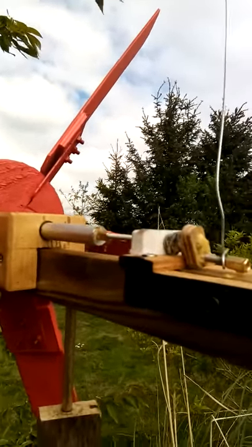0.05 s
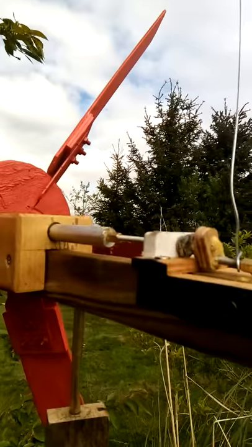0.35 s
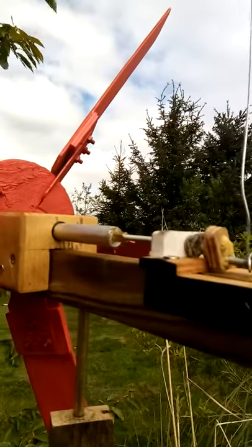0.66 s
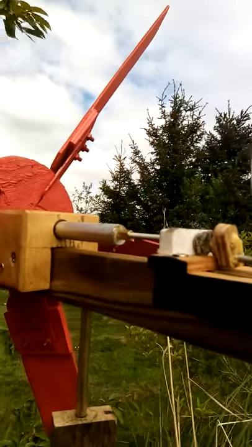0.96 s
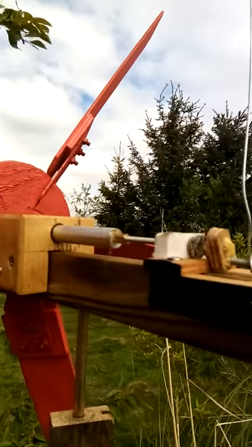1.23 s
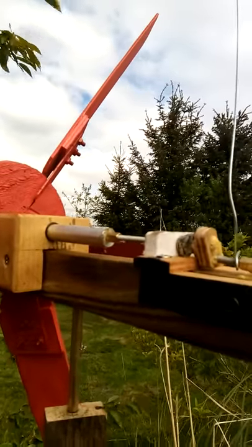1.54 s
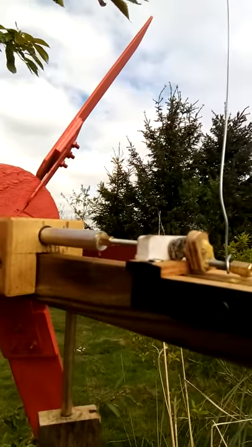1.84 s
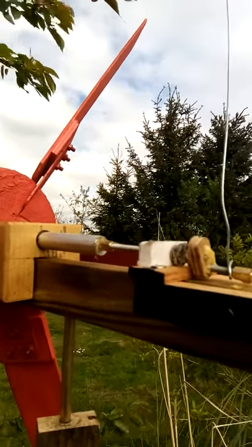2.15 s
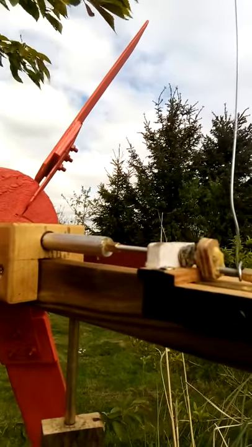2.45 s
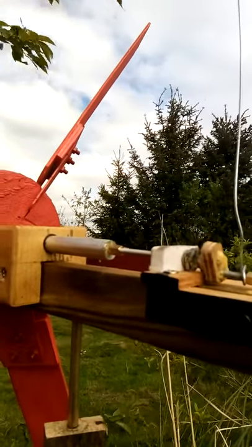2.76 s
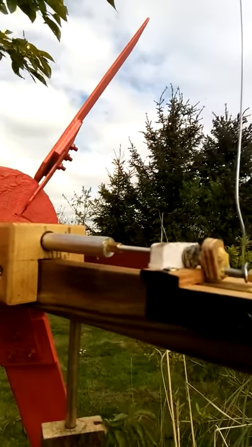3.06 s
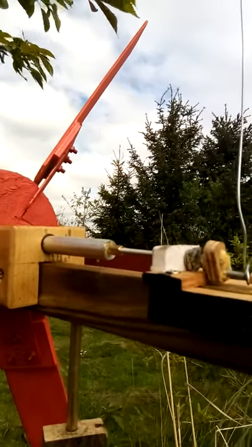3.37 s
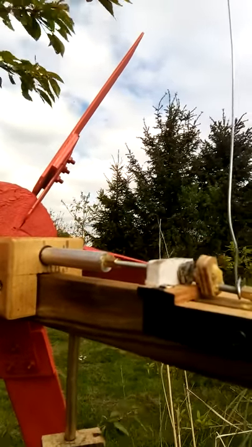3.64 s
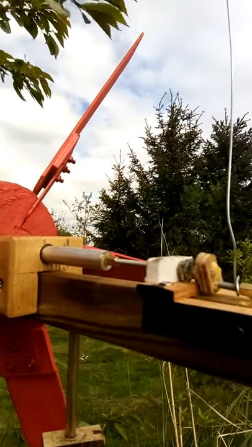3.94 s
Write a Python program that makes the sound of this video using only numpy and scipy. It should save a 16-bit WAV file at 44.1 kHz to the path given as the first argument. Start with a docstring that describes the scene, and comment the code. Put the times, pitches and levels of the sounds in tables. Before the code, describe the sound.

A wooden whirligig clacks with a short metallic ring from about 0.4 seconds, roughly four times a second, with faint rubbing and ticks between. The clacks are strongest from 0.7 to 1.7 seconds, then slow and soften. Wind rumbles and thumps unevenly on the microphone throughout. A small bird gives a faint falling chirp at 0.5 seconds and a high buzz from 3.3 seconds to the end.

```python
"""A ringing clack, again and again and ever slower, comes through rumbling wind: a wooden whirligig turns
in a garden. Once a turn its steel shaft drops in its metal sleeve and sets it ringing; in between it rubs
lightly. Gusts rumble and thump on each of the two microphone openings (ports) separately, over a faint
hiss. A small bird gives a falling chirp and later a long buzz."""
import sys
import numpy as np
from scipy import signal
from scipy.fft import rfft, irfft
from scipy.io import wavfile
from scipy.ndimage import uniform_filter1d

SR = 44100
rng = np.random.default_rng(int(sys.argv[2]) if len(sys.argv) > 2 else 0)


def wav_out(sig):
    """Save sig, one row per channel (or a flat mono array), as 16-bit PCM at SR to the path in sys.argv[1]."""
    wavfile.write(sys.argv[1], SR, np.round(np.clip(np.atleast_2d(sig).T, -1, 1) * 32767).astype(np.int16))


N = 176400
T = np.arange(N) / SR

# the shaft drops once a turn: (time [s], relative level [dB], fade time of the rattle [s])
SHAFT_DROPS = [(.437, -31.5, 0.017), (0.7335, -22.5, 0.031), (0.9664, -23.5, 0.025), (1.199, -20, 0.032),
               (1.4349, -20, 0.033), (1.689, -20.5, 0.032), (1.9791, -24.5, 0.044), (2.2793, -24, 0.017),
               (2.5945, -27, 0.03), (2.905, -27, 0.026), (3.2187, -29.5, 0.026), (3.875, -34, 0.041)]
# tone colour of scrapes and ticks: (frequency [Hz], relative level [dB])
SCRAPE_COLOUR = [(2500, -5), (4500, -1.5), (6000, 4), (7500, -1.5), (9000, -10.5), (11500, -25),
                 (15000, -27)]


def from_db(db):
    """Turn decibels into a factor to multiply by."""
    return 10 ** (np.asarray(db) / 20)


def rms_one(x):
    """Scale a signal so that its average level (rms) is 1."""
    return x / np.sqrt(np.mean(x ** 2) + 1e-20)


def curve(rows):
    """A volume curve through (time [s], level [dB]) points."""
    return from_db(np.interp(T, *np.transpose(rows)))


def colour(x, points):
    """Filter through (frequency [Hz], level [dB]) points; white noise keeps its power."""
    size = 2 * N
    hz, db = np.transpose(points)
    log_hz = np.log(np.fft.rfftfreq(size, 1 / SR) + 1)
    gain = rms_one(from_db(np.interp(log_hz, np.log(hz), db)))
    # minimum phase: the filter never sounds ahead of its input
    cepstrum = irfft(np.log(gain))
    cepstrum[1:N] *= 2
    cepstrum[N + 1:] = 0
    return irfft(rfft(x, size) * np.exp(rfft(cepstrum)))[..., :N]


def drift(rate_hz):
    """A random wander of typical size 1, mostly slower than rate_hz."""
    hz = np.fft.rfftfreq(N, 1 / SR)
    return rms_one(irfft(rfft(rng.standard_normal(N)) / (1 + (hz / rate_hz) ** 2), N))


def flicker(rate_hz, depth_db):
    """A volume that wavers at random, by twice depth_db at most."""
    return from_db(depth_db * np.clip(drift(rate_hz), -2, 2))


def even(x, samples):
    """Hold the short-term level of a noise at 1."""
    power = uniform_filter1d(uniform_filter1d(x ** 2, samples), samples)
    return x / np.sqrt(power + 1e-12)


def decay(start, fade_s):
    """A sudden start that dies away."""
    return (T >= start) * np.exp(-np.maximum(T - start, 0) / fade_s)


def swell(centre, width_s):
    """A smooth rise and fall."""
    return np.exp(-((T - centre) / width_s) ** 2)


def stereo_noise(alike):
    """White noise for left and right; alike (0 to 1) is the share they have in common."""
    common = np.sqrt(alike) * rng.standard_normal(N)
    return common + np.sqrt(1 - alike) * rng.standard_normal((2, N))


def ring(x, hz, ring_s):
    """One ringing tone, set off by x, that fades by 60 dB in ring_s."""
    damping, angle = from_db(-60 / (ring_s * SR)), 2 * np.pi * hz / SR
    return signal.lfilter([0, np.sin(angle)], [1, -2 * damping * np.cos(angle), damping ** 2], x + 1e-18)


def air():
    """The breeze in the trees and the microphone's own hiss make a faint, steady noise."""
    # tone colour of the hiss: (frequency [Hz], relative level [dB])
    hiss_colour = [(500, 0.5), (1000, 1), (2000, -17.5), (4000, -22), (8000, -17), (11000, -26.5),
                   (13500, -39.5), (15000, -21.5)]
    return from_db(-55.5) * colour(stereo_noise(alike=0.12), hiss_colour)


def bird_buzz(pulse_hz=160.7):
    """A bird buzzes in rapid, nearly regular pulses, blurred by distance."""
    # loudness of the buzz: (time [s], level [dB])
    buzz_levels = [(3.24, -85), (3.31, -55), (3.45, -52), (3.56, -46), (3.61, -53.5), (3.68, -47.5),
                   (3.76, -46.5), (3.86, -52), (3.93, -52.5), (3.98, -68)]
    # its tone colour: (frequency [Hz], relative level [dB])
    buzz_colour = [(1500, -55), (3050, -32), (3650, -6), (4050, -3), (4450, 0), (4850, -1), (5350, -5),
                   (6200, -24), (9000, -55)]
    cycles = np.cumsum(pulse_hz * (1 + 0.004 * drift(10))) / SR
    pulses = rms_one(np.diff(np.floor(cycles), prepend=0))
    blur = stereo_noise(alike=0) * rms_one(1 + np.cos(2 * np.pi * cycles) / 2)
    arrivals = np.array([np.roll(pulses, 20), pulses])   # reaches the right port first
    return curve(buzz_levels) * colour(rms_one(arrivals + 1.6 * blur), buzz_colour)


def bird_chirp(blur_hz=170):
    """The bird gives a thin falling whistle, blurred by distance."""
    # the call: (time [s], length [s], start pitch [Hz], end pitch [Hz], relative level [dB])
    chirps = [(0.518, 0.048, 5270, 4460, -51.5)]
    out = np.zeros(N)
    for start, length, start_hz, end_hz, db in chirps:
        glide = np.sqrt(np.clip((T - start) / length, 0, 1))
        phase = 2 * np.pi * np.cumsum(start_hz + (end_hz - start_hz) * glide) / SR
        whistle = (1 + drift(blur_hz)) * np.sin(phase) + drift(blur_hz) * np.cos(phase)
        out += from_db(db) * np.sin(np.pi * glide) * whistle
    return out * from_db([[3.3], [-3.3]])   # louder on the left


def buffets(eddies, spikes_per_s=550, low_cut_hz=223, size=4096):
    """Each eddy (swirl of air) thumps a port with one sharp pressure spike amid a few random ones."""
    out = np.zeros(N + 2 * size)
    hz = np.fft.rfftfreq(size, 1 / SR)
    t = (np.arange(size) - size // 2) / SR
    high_pass = signal.butter(2, low_cut_hz, "high", fs=SR, output="sos")
    low_cut = signal.sosfreqz(high_pass, hz, fs=SR)[1]
    for time, db, fall_hz, length in eddies:
        spikes = 0.66 * (rng.random(size) < spikes_per_s / SR) * rng.uniform(-1.575, 1.87, size)
        spikes += 0.018 * rng.standard_normal(size)
        spikes *= np.exp(-2 * (t / length) ** 2)
        spikes[size // 2] = rng.choice([-1, 1])   # the main spike pushes or pulls
        treble_cut = np.exp(-hz / fall_hz) / (1 + (hz / 2600) ** 4)
        thump = rms_one(irfft(rfft(spikes) * low_cut * treble_cut))
        start = int(time * SR) + size // 2
        out[start:start + size] += from_db(db + 4) * thump * np.sqrt(length * SR / size)
    return out[size:size + N]


def gusts(strength):
    """Wind on one port makes a lumpy rumble; fine swirls add a flutter on top."""
    # tone colours of the rumble and the flutter: (frequency [Hz], relative level [dB])
    rumble_colour = [(20, -34), (35, -16.5), (60, -7), (95, 1), (140, -2.5), (200, -8.5), (300, -17.5),
                     (450, -37.5), (800, -75.5), (2000, -83.5)]
    flutter_colour = [(100, -16.5), (250, 5), (450, -2), (700, -12), (1100, -20), (1800, -38.5),
                      (4000, -80)]
    lumps = rms_one(flicker(rate_hz=35, depth_db=2.5))
    rumble = even(colour(rng.standard_normal(N), rumble_colour), samples=1000)
    flutter = rms_one(colour(rng.standard_normal(N), flutter_colour) * flicker(rate_hz=59, depth_db=5))
    return curve(strength) * lumps * (from_db(4.5) * rumble + from_db(-11.5) * flutter)


def wind():
    """Each port is hit by its own gusts and eddies."""
    # strength of the wind: (time [s], relative level [dB])
    strength_left = [(0.0, -18), (0.1, -38.5), (0.36, -24.5), (0.42, -56), (0.5, -28.5), (0.76, -24.5),
                     (0.86, -28), (0.92, -22), (1.16, -35), (1.26, -17.5), (1.4, -26.5), (1.44, -36.5),
                     (1.5, -21.5), (1.96, -24.5), (2.1, -32.5), (2.14, -23.5), (2.29, -29.5), (2.33, -36),
                     (2.39, -27.5), (2.54, -41.5), (2.61, -25.5), (2.69, -42.5), (2.79, -24.5),
                     (2.89, -28.5), (2.95, -20), (2.97, -36), (3.01, -23), (3.11, -25.5), (3.37, -19.5),
                     (3.45, -29), (3.47, -21.5), (3.57, -20), (3.69, -26.5), (3.73, -37), (3.85, -19),
                     (3.99, -28.5)]
    strength_right = [(0.0, -33), (0.12, -18), (0.32, -36), (0.36, -20), (0.46, -22), (0.52, -53),
                      (0.64, -31), (0.83, -26), (0.88, -45), (0.96, -19), (1.0, -30), (1.12, -22.5),
                      (1.38, -33.5), (1.52, -22.5), (1.62, -41), (1.66, -39), (1.7, -33.5), (1.8, -21.5),
                      (1.92, -40), (2.08, -21.5), (2.2, -50), (2.31, -26), (2.43, -39.5), (2.49, -27.5),
                      (2.59, -22), (2.65, -39), (2.71, -21.5), (2.87, -41), (2.91, -23), (3.21, -37.5),
                      (3.33, -21.5), (3.37, -35), (3.41, -34), (3.49, -52), (3.59, -18), (3.63, -43),
                      (3.67, -26), (3.75, -43), (3.99, -26.5)]
    # eddies that hit: (time [s], relative level [dB], treble fall-off [Hz], length [s])
    eddies_left = [(0.032, -13, 167, 0.0035), (0.569, -21.5, 208, 0.005), (0.652, -18.5, 327, 0.008),
                   (0.687, -16.5, 387, 0.0079), (0.723, -22, 313, 0.0056), (0.806, -25, 245, 0.01),
                   (0.894, -10, 306, 0.0047), (0.931, -15, 200, 0.0031), (1.026, -13.5, 437, 0.0099),
                   (1.059, -24.5, 440, 0.023), (1.281, -15.5, 480, 0.022), (1.37, -18, 218, 0.0082),
                   (1.539, -15.5, 231, 0.0093), (1.614, -15.5, 318, 0.0026), (1.634, -21.5, 212, 0.007),
                   (1.712, -25.5, 197, 0.025), (1.798, -19.5, 507, 0.0035), (1.874, -22, 221, 0.006),
                   (1.929, -23, 228, 0.015), (1.961, -16, 257, 0.011), (2.142, -20, 520, 0.0062),
                   (2.193, -20.5, 294, 0.0053), (2.748, -17.5, 214, 0.0045), (2.795, -13, 387, 0.0097),
                   (2.813, -19, 474, 0.013), (2.844, -20.5, 320, 0.013), (3.011, -25, 243, 0.017),
                   (3.06, -21, 260, 0.0062), (3.078, -19, 232, 0.0085), (3.14, -19, 283, 0.0085),
                   (3.222, -19, 304, 0.012), (3.487, -14.5, 426, 0.0031), (3.602, -15.5, 1450, 0.0086),
                   (3.811, -18.5, 356, 0.0052), (3.846, -20.5, 230, 0.0043), (3.868, -19, 308, 0.01),
                   (3.9, -24, 383, 0.0081), (3.955, -15.5, 223, 0.009)]
    eddies_right = [(0.038,-27,194,0.0088), (0.104,-22,233,0.016), (0.173,-16.5,364,0.0072),
                    (0.208,-19,185,0.0047), (0.225,-18,173,0.0091), (0.363,-20.5,210,0.014),
                    (0.383,-17,258,0.0047), (0.4,-17,218,0.022), (0.425,-27,376,0.019),
                    (0.448,-17.5,240,0.0058), (1.065,-18,290,0.013), (1.109,-20.5,317,0.005),
                    (1.124,-12.5,346,0.0061), (1.239,-18,163,0.013), (1.662,-14.5,144,0.0089),
                    (1.278,-33,220,0.006), (1.791,-21,189,0.0051), (1.86,-17.5,236,0.013),
                    (2.064,-20.5,224,0.011), (2.079,-20.5,263,0.0066), (2.225,-26,230,0.019),
                    (2.306,-16.5,173,0.01), (2.321,-12.5,206,0.0063), (2.503,-19.5,224,0.0077),
                    (2.55,-23.5,438,0.0045), (2.923,-22.5,203,0.018), (2.951,-22.5,181,0.0083),
                    (3.262,-21.5,248,0.015), (3.331,-23.5,219,0.006), (3.577,-24.5,240,0.0038),
                    (3.671,-23,222,0.008), (3.961,-17.5,290,0.023)]
    left = gusts(strength_left) + buffets(eddies_left)
    right = gusts(strength_right) + buffets(eddies_right)
    return np.array([left, right])


def rubbing():
    """The turning shaft rubs dryly in its sleeve, louder just after each drop."""
    # how hard the shaft presses: (time [s], relative level [dB])
    pressure = [(.12, 0.5), (.3, -0.5), (.5, 3.5), (1.9, 1.5), (2.4, -3), (2.68, 6), (2.8, -6.5),
                (2.97, 3.5), (3.06, -5), (3.27, 1.5), (3.6, -1)]
    # tone colour of the rubbing: (frequency [Hz], relative level [dB])
    rub_colour = [(1000, 3), (1700, 3.5), (2600, 4), (3300, -0.5), (4200, -3), (6100, 3.5), (7500, -8),
                  (10000, -14.5), (15000, -29)]
    settling = sum(decay(time, fade_s=0.046) for time, _, _ in SHAFT_DROPS)
    level = curve(pressure) * from_db(-56 + 4.5 * settling) * flicker(rate_hz=22, depth_db=2)
    return level * colour(stereo_noise(alike=0.15), rub_colour)


def ticks():
    """The linkage ticks: tiny bursts of bright noise."""
    # the ticks: (time [s], relative level [dB])
    tick_list = [(0.0662, -40.5), (0.1061, -41), (0.1218, -43.5), (0.2177, -41), (0.4944, -42.5),
                 (0.96, -41), (1.753, -40), (1.806, -43.5), (2.674, -47), (2.271, -42), (2.36, -42.5),
                 (2.8936, -40)]
    bursts = sum(from_db(db - 3) * decay(time, fade_s=0.0084) for time, db in tick_list)
    return colour(bursts * stereo_noise(alike=0.067), SCRAPE_COLOUR)


def squeaks(ring_s=0.0088):
    """The bearing slips and squeaks briefly: noise narrowed to one pitch."""
    # the squeaks: (time [s], pitch [Hz], level [dB])
    squeak_list = [(.603, 2960, -53.5), (1.582, 4680, -59), (3.328, 3010, -51.5)]
    slip = rng.standard_normal(N)
    out = np.zeros(N)
    for time, hz, db in squeak_list:
        tone = rms_one(ring(ring(slip, hz, ring_s), hz, ring_s / 2))
        out += from_db(db) * swell(time, width_s=0.018) * tone
    return out


def sleeve_ring(contact, varies_db=4):
    """Shaft and sleeve ring with many tones when struck, in a slightly different mix each turn."""
    # tones of the metal: (pitch [Hz], relative level [dB])
    tones = [(1980, -2), (2190, -2), (2440, -6), (2670, -7), (2850, -6), (2980, -5), (3680, -3), (3810, -6),
             (3945, -6), (4285, -4), (4750, -3), (5450, -1), (6020, -2), (6340, -2)]
    turn = np.searchsorted([time for time, _, _ in SHAFT_DROPS], T)
    out = np.zeros((2, N))
    for hz, db in tones:
        turn_db = db - 43 + varies_db * rng.uniform(-1, 1, len(SHAFT_DROPS) + 1)
        out += from_db(turn_db)[turn] * ring(contact, hz, ring_s=0.065)
    return out


def clacks(bounce_after_s=0.018, scrape_after_s=0.015):
    """The shaft drops on the sleeve, bounces once, then rattles and scrapes to rest."""
    # the shaft also catches on the sleeve between drops: (time [s], relative level [dB])
    catches = [(0.846, -40.5), (1.06, -48), (1.153, -46), (1.337, -42.5), (1.892, -44.5), (2.105, -55),
               (2.21, -51), (2.48, -56)]
    # tone colour of metal hitting metal: (frequency [Hz], relative level [dB])
    contact_colour = [(1200, -14.5), (1900, -11.5), (2800, 0.5), (3330, -6), (3900, 2.5), (4800, -11.5),
                      (6400, -12.5), (8000, -18), (11000, -39)]
    force = sum(from_db(db) * swell(time, width_s=0.013) for time, db in catches)
    slide = np.zeros(N)
    for time, db, rattle_s in SHAFT_DROPS:
        strike = decay(time, fade_s=0.0013)
        bounce = from_db(-12.5) * swell(time + bounce_after_s, width_s=0.0021)
        rattle = from_db(-11) * decay(time, rattle_s)
        force += from_db(db) * (strike + bounce + rattle)
        slide += from_db(db - 24) * swell(time + scrape_after_s, width_s=0.018)
    chatter = flicker(rate_hz=150, depth_db=2)
    grain = even(stereo_noise(alike=0.72), samples=40)
    contact = from_db(-6.5) * colour(force * chatter * grain, contact_colour)
    ringing = sleeve_ring(contact)
    scrape = colour(slide * chatter * stereo_noise(alike=0.049), SCRAPE_COLOUR)
    return contact + ringing + scrape


def wooden_frame(x, ring_s=0.09):
    """The frame and its blades add a dense, short ring, different at each port."""
    tail = rng.standard_normal((2, N // 8)) * from_db(-60 * T[:N // 8] / ring_s)
    tail /= np.sqrt((tail ** 2).sum(axis=1, keepdims=True))
    return x + from_db(-6) * signal.fftconvolve(x, tail, axes=1)[:, :N]


def port_balance(x):
    """The two ports pick up high and low sounds differently."""
    # how much louder the left port is: (frequency [Hz], left minus right [dB])
    left_lead = [(1000, 6.5), (2200, 9), (3900, 3), (6100, 9), (8000, 5.5), (9500, -7), (11500, -13.5),
                 (15000, -9)]
    hz, db = np.transpose(left_lead)
    balance_db = np.interp(np.log(np.fft.rfftfreq(N, 1 / SR) + 1), np.log(hz), db)
    return irfft(rfft(x) * from_db([balance_db / 2, -balance_db / 2]), N)


def scene():
    """The whirligig and the bird, heard through the wind."""
    wind_noise = wind()
    hiss = air()
    whirligig = wooden_frame(clacks() + rubbing() + ticks() + squeaks())
    return port_balance(whirligig + hiss) + bird_buzz() + bird_chirp() + wind_noise


def record(dry):
    """An automatic volume control dips after the hardest gusts; the highest treble is cut."""
    limit_db, share_removed, recovery_db_per_s, stop_hz = -9, 0.57, 108, 16400
    peak_db = 20 * np.log10(np.abs(dry).max(axis=0) + 1e-9)
    over_db = np.maximum(peak_db - limit_db, 0)
    recovery_db = recovery_db_per_s * T
    held_db = np.maximum.accumulate(over_db + recovery_db) - recovery_db   # jumps up, sinks slowly
    dipped = dry * from_db(-share_removed * uniform_filter1d(held_db, size=130))
    return signal.sosfilt(signal.cheby2(14, 60, stop_hz, fs=SR, output="sos"), dipped)


dry = scene()
out = record(dry)
wav_out(out)
```